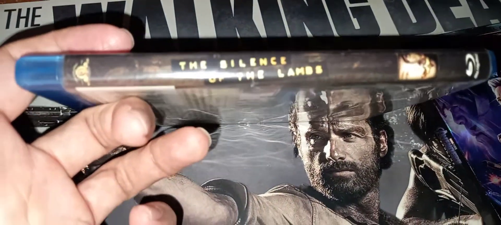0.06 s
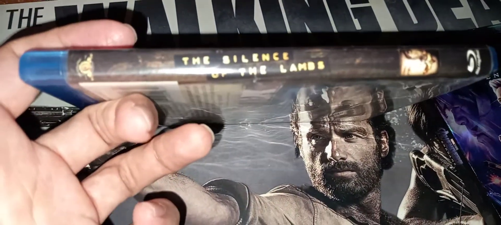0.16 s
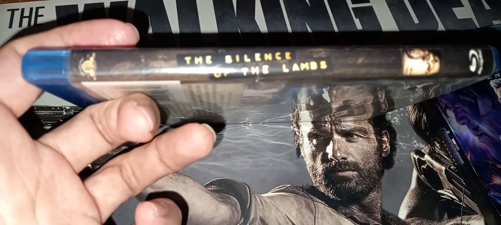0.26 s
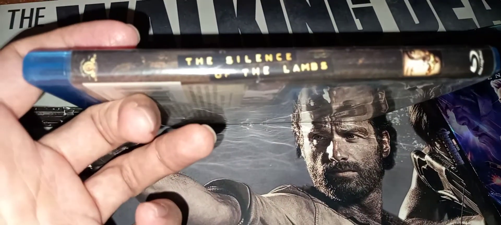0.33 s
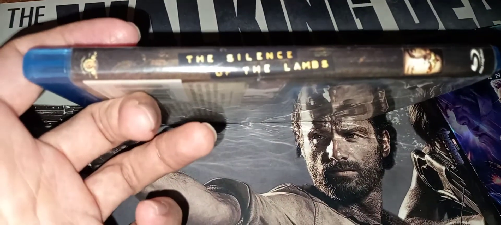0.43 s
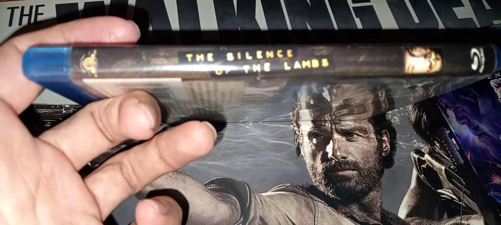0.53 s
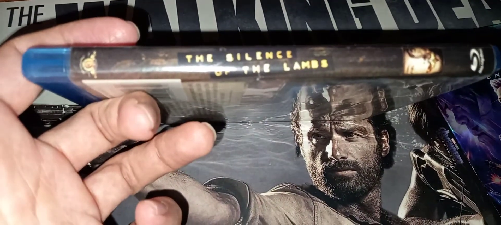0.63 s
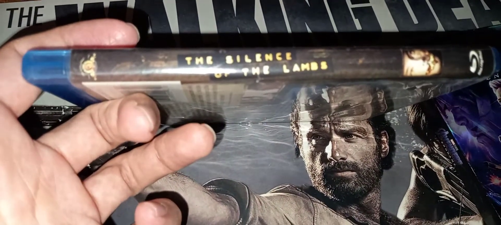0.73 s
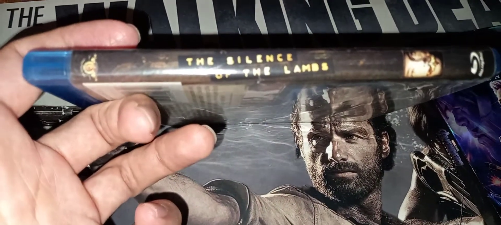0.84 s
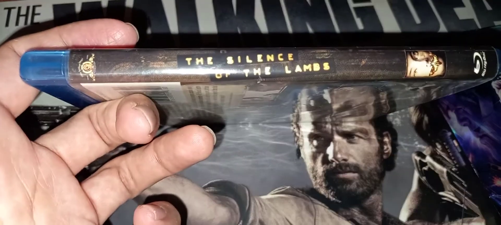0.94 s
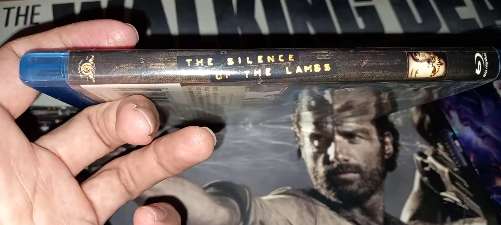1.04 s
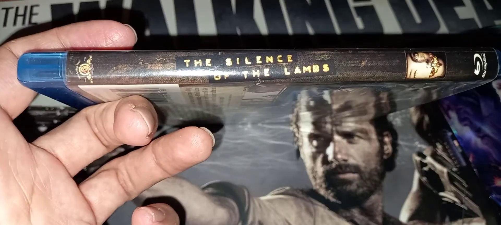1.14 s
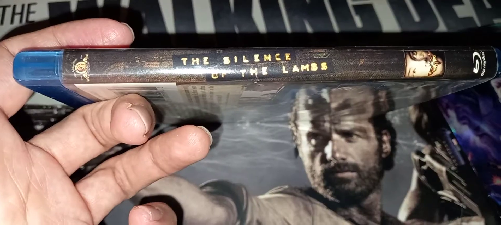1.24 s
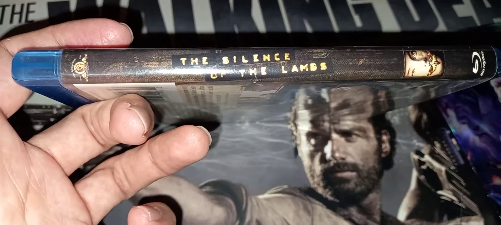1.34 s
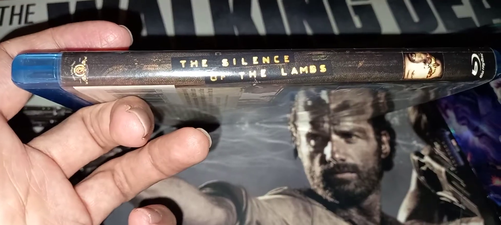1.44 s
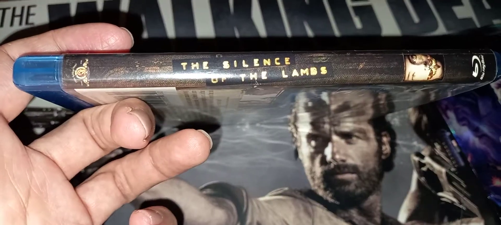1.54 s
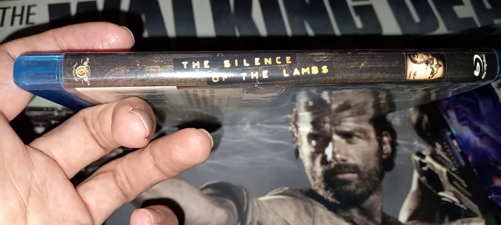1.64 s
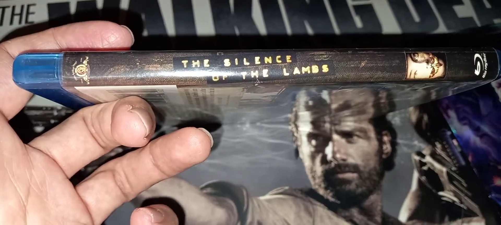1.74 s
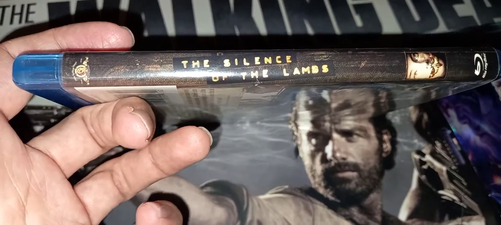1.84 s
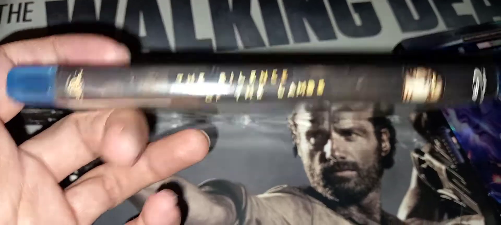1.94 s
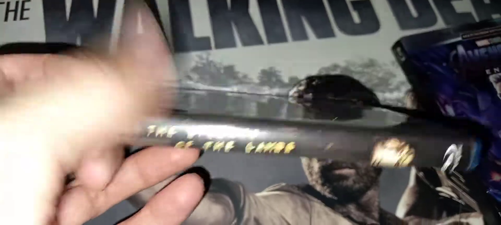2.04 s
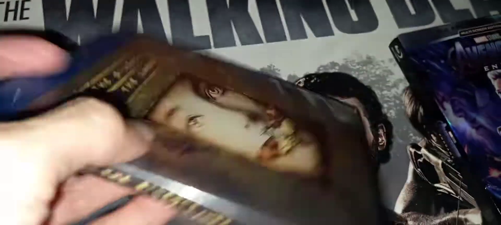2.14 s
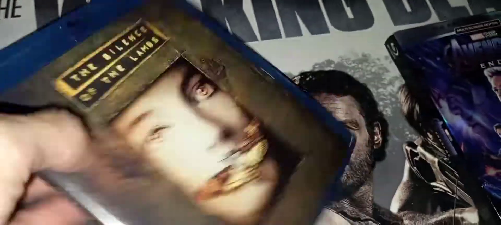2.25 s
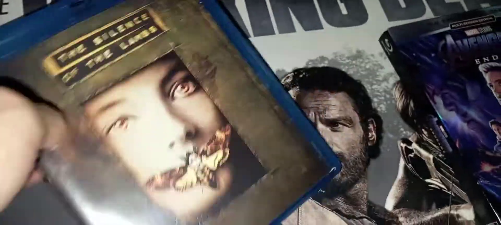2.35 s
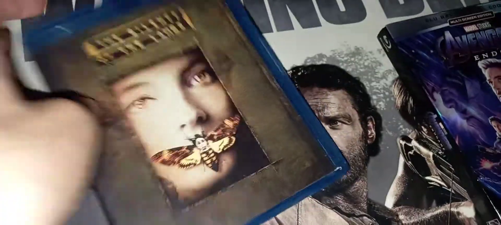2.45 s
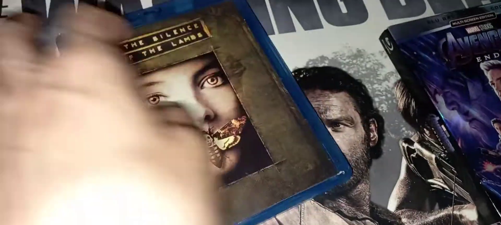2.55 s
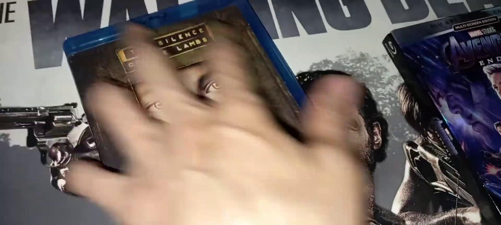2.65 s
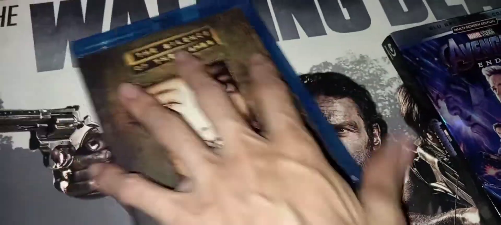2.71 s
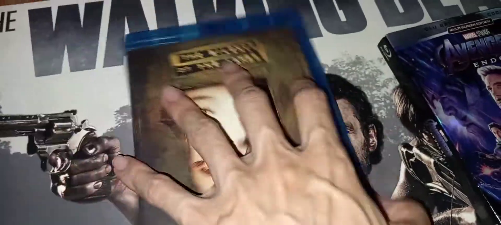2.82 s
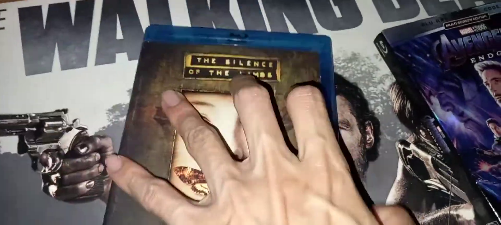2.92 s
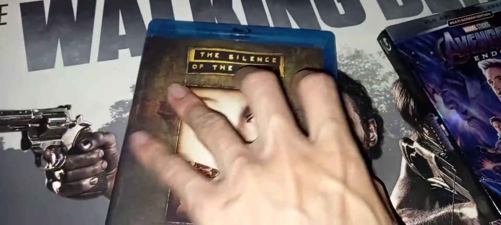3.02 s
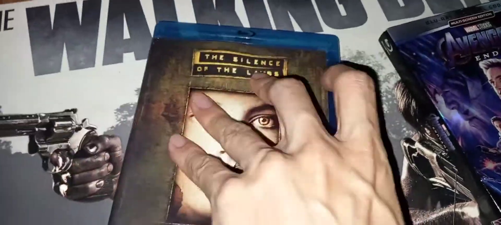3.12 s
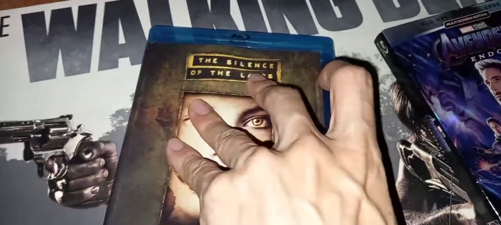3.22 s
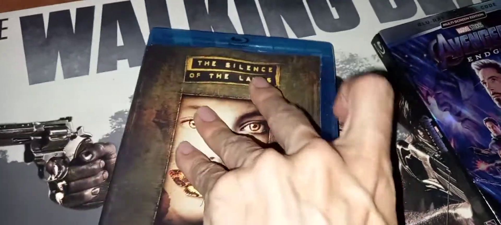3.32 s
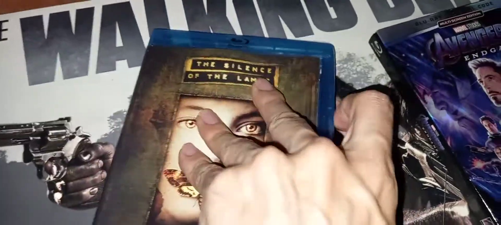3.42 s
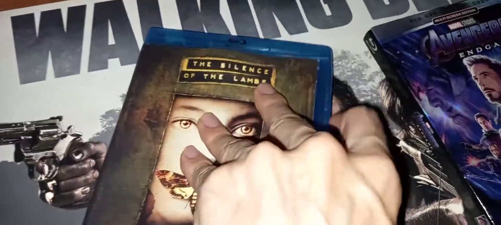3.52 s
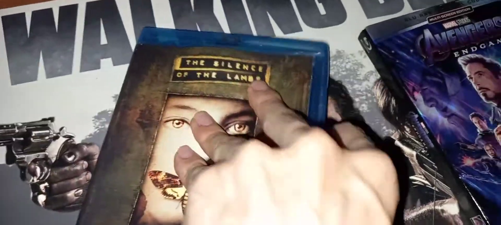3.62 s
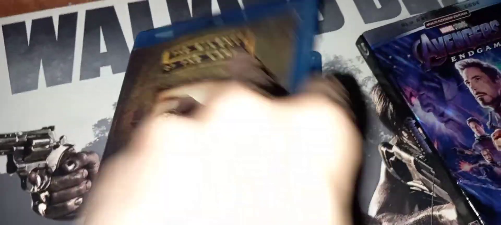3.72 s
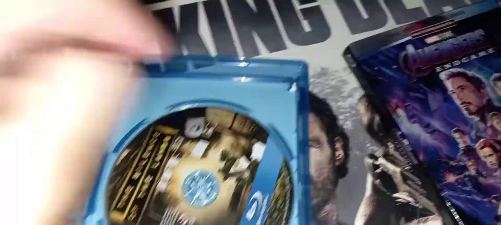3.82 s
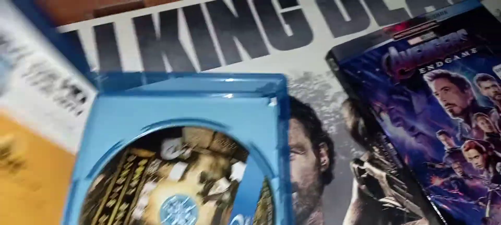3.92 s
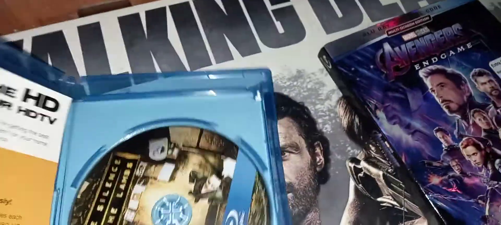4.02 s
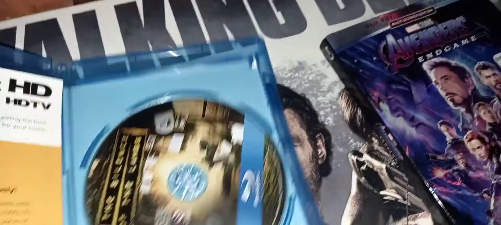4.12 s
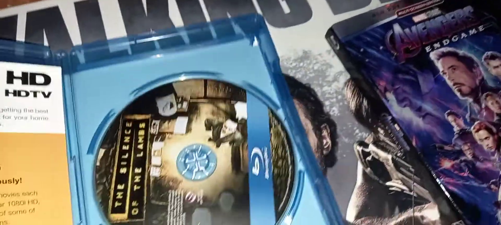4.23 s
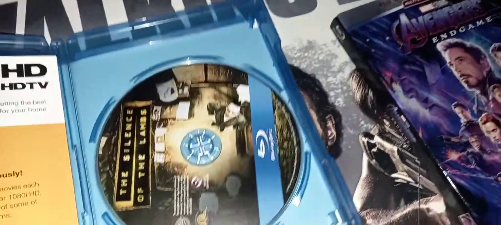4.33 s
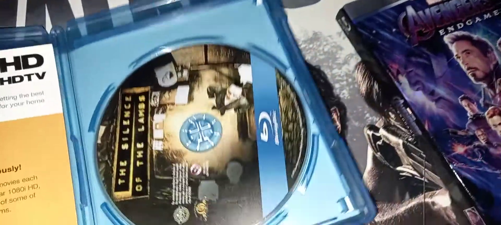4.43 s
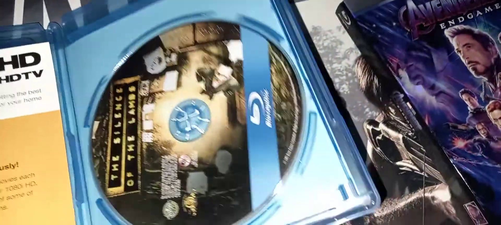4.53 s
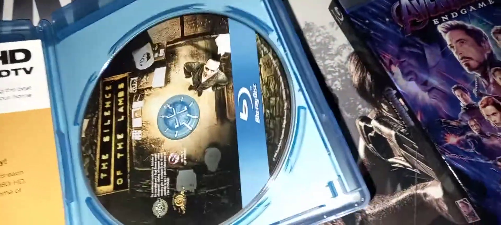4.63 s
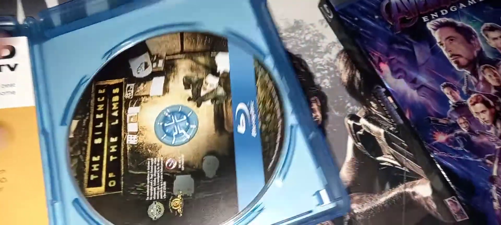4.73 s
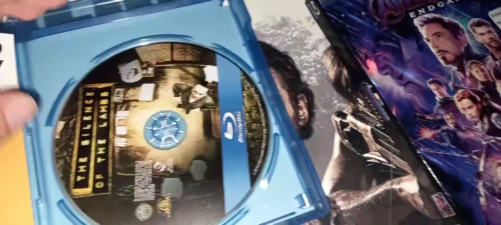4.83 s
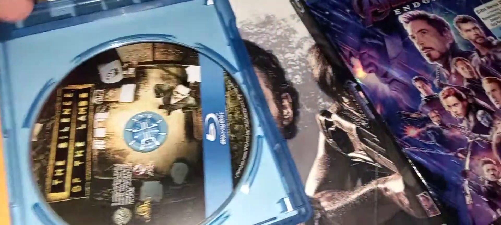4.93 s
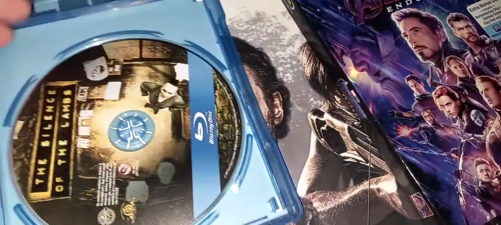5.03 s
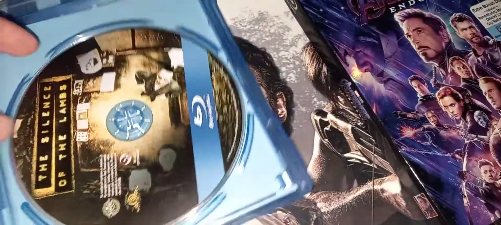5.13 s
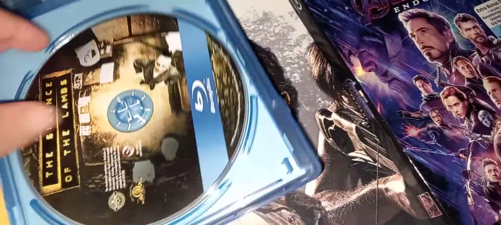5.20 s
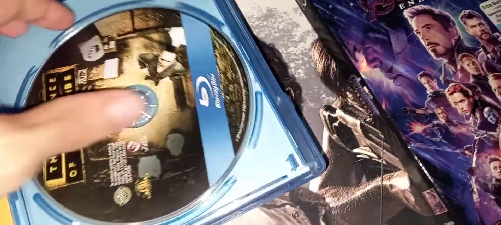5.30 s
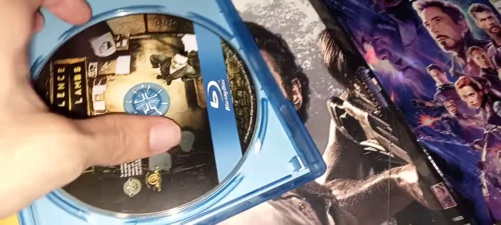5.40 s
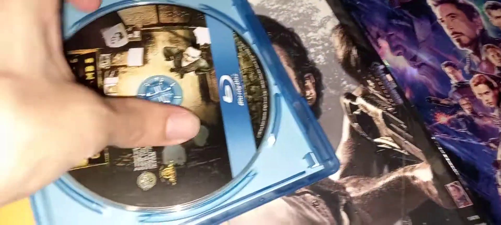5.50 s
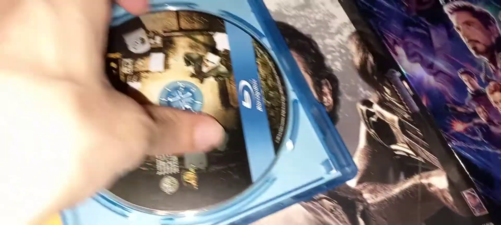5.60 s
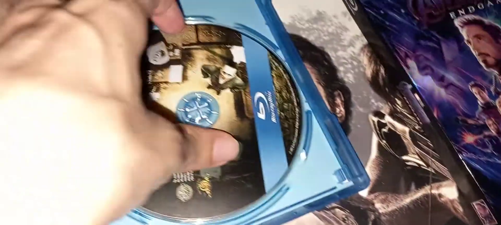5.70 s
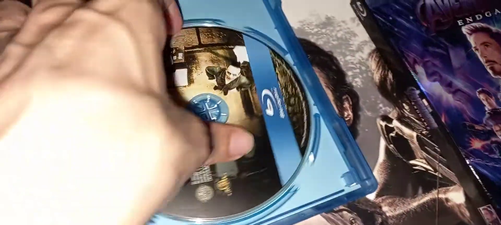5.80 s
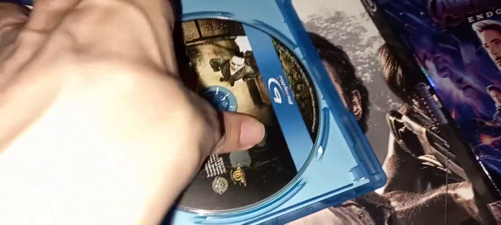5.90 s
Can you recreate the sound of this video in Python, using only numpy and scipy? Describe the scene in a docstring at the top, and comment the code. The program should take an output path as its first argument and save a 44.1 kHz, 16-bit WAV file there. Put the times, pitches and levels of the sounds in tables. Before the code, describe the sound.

A quiet indoor room with soft fan-like hum. A hand turns a thin plastic case, then slaps it down sharply on a paper-covered table. It slides slightly, then its catch squeaks and snaps open, the hinge rattling quickly. After a pause, fingers tap and tick on the disc and tray, with faint high chirps far off. Close handheld two-channel microphone, little echo.

```python
"""In a quiet room with a fan-like hum and faint far chirps, a plastic disc case is turned, slapped down
on a poster on a table, slid, prised open with a squeak and a rattle of hinge slips, then fingered.
Blows and stick-slip pulses set off damped resonances of the case. Friction is uneven noise, partly
ringing the shell. The air is shaped noise with a wavering tone, and each chirp is a falling note.
Two microphone ports hear it all, with echoes of the case and the chirps."""
import sys
import numpy as np
from scipy import signal
from scipy.fft import rfft, irfft, next_fast_len
from scipy.io import wavfile
from scipy.ndimage import uniform_filter1d

SR = 44100
rng = np.random.default_rng(int(sys.argv[2]) if len(sys.argv) > 2 else 0)


def pcm_store(signal):
    """Save signal as 16-bit PCM."""
    levels = np.round(np.clip(np.atleast_2d(signal), -1, 1) * 32767)
    wavfile.write(sys.argv[1], SR, levels.astype(np.int16).T)


N = 262836

# Resonances of the plastic shell. Each row: pitch in Hz, width in Hz, strength in dB.
SHELL_MODES = [(1153, 214, 1.5), (1345, 263, 3.5), (1617, 270, 1.5), (2047, 187, -3.5), (2207, 540, -0.5)]
# Resonances of the hollow inside the case. Each row: pitch in Hz, width in Hz, strength in dB.
HOLLOW_MODES = [(503, 158, -1), (711, 130, 1.5), (896, 450, -26)]


def gain_of(db):
    """Turns decibels into a plain multiplier."""
    return 10 ** (np.asarray(db) / 20)


def evened(x):
    """Scales a signal to an average (rms) level of 1."""
    return x / np.sqrt(np.mean(x ** 2) + 1e-20)


def read(points, hz):
    """Reads a curve between its points, with pitch on a logarithmic scale."""
    f, value = np.transpose(points)
    return np.interp(np.log(hz + 1), np.log(f + 1), value)


def along(rows, column):
    """One column of a time curve, at every sample."""
    rows = np.array(rows)
    return np.interp(np.arange(N) / SR, rows[:, 0], rows[:, column])


def add(mix, s, sound):
    """Adds a sound to the mix, starting at s seconds."""
    part = mix[..., round(s * SR):][..., :sound.shape[-1]]
    part += sound[..., :part.shape[-1]]


def ring(modes, contact_ms=0.):
    """Answer of damped resonances to one push, peak 1; a longer contact leaves out the treble."""
    t = np.arange(4096) / SR
    out = np.zeros(len(t))
    for k, (hz, width, db) in enumerate(modes):
        # a wider resonance dies faster; neighbours swing in opposite directions
        dying = np.exp(-np.pi * width * t)
        out += (-1) ** k * gain_of(db) * dying * np.sin(2 * np.pi * hz * t)
    push = np.hanning(3 + int(contact_ms * SR / 1000))
    out = np.convolve(out, push)[:len(t)]
    return out / abs(out).max()


def coloured(x, points):
    """Shapes the spectrum of a steady signal."""
    size = next_fast_len(N)
    gain = gain_of(read(points, np.fft.rfftfreq(size, 1 / SR)))
    return irfft(rfft(x, size) * gain, size)[..., :N]


def air():
    """Steady room noise in drifting patches, with a low hum that wavers in pitch and level."""
    # How alike the two ports hear the noise. Each row: pitch in Hz, likeness from -1 to 1.
    likeness = [(60, 0.77), (180, 0.83), (550, 0.71), (1650, -0.27), (4970, 0.13), (15000, -0.03)]
    # Relative spectrum of the noise. Each row: pitch in Hz, level in dB per Hz.
    spectrum = [(25, 8), (55, -2), (95, 1.5), (205, -7.5), (260, -14), (325, -6), (450, -15.5), (630, -8),
                (940, -4), (1250, -9.5), (2500, -10.5), (3100, -26.5), (5500, -30.5), (6900, -24.5),
                (7600, -44), (16000, -41.5)]
    # Strength of the hum. Each row: time in seconds, level in dB.
    hum_levels = [(0.0, -87), (0.13, -56), (0.53, -53.5), (0.58, -62.5), (1.03, -52), (1.73, -82),
                  (2.12, -50.5), (2.26, -68), (2.8, -56.5), (2.92, -62), (3.62, -56.5), (3.95, -70),
                  (4.1, -58.5), (4.7, -68), (4.86, -51.5), (5.21, -70), (5.96, -58)]
    noise_db, hum_hz, hum_waver_hz = -55.5, 94, 10

    frames, hz = N // 256 + 5, np.fft.rfftfreq(1024, 1 / SR)
    a, b, c, d, patches = rng.standard_normal((frames, 513, 5)).T
    patches = uniform_filter1d(patches, 12, 0)
    patches = evened(uniform_filter1d(patches, 14, 1))
    same = np.clip(read(likeness, hz), -1, 1)[:, None]
    left = a + 1j * b
    right = same * left + np.sqrt(1 - same ** 2) * (c + 1j * d)
    z = np.array([left, right]) * gain_of(1.5 * patches)
    wash = signal.istft(z, nperseg=1024, noverlap=768)[1][:, :N]
    wash = gain_of(noise_db) * evened(coloured(wash, spectrum))

    waver = evened(uniform_filter1d(rng.standard_normal(N), 900))
    turns = np.cumsum(hum_hz + hum_waver_hz * waver) / SR
    hum = np.sqrt(2) * gain_of(along(hum_levels, 1)) * np.sin(2 * np.pi * turns)
    return wash + hum


def rubs():
    """Friction: dense uneven grains give a skin hiss and scrape the shell into ringing."""
    # Hands and case sliding. Each row: start in seconds, length in seconds, rise in seconds, hiss in dB,
    # treble in dB relative to the hiss, shell scraping in dB.
    strokes = [(1.922, 0.15, 0.072, -57.5, -42, -59.5), (2.007, 0.61, 0.22, -62.5, -3, -62.5),
               (2.491, .09, 0.0049, -53.5, 1, -58), (2.694, 0.062, 0.019, -53.5, -29, -49.5),
               (2.712, 0.25, 0.047, -46, -1, -50), (3.038, 0.14, .042, -64.5, -7, -60.5),
               (3.275, 0.172, 0.091, -43.5, -4.5, -43), (3.441, 0.098, 0.044, -36.5, -7.5, -35),
               (3.513, 0.085, 0.01, -54, -7, -47.5), (3.57, 0.32, 0.012, -57.5, -7, -51.5),
               (3.843, 0.17, 0.069, -60.5, -4.5, -69), (4.063, 0.17, 0.026, -59.5, -8, -87),
               (4.921, 0.088, .0085, -60.5, -1.5, -59.5), (5.243, 0.063, .005, -75.5, 13, -94),
               (5.413, 0.06, 0.026, -57, -19, -56), (5.754, .047, 0.0042, -66, 3, -75),
               (5.843, 0.05, 0.0022, -55.5, 7, -58.5)]
    # A faint swish: the same columns without the start. Its negative rise makes the swish
    # begin abruptly, already partly faded, and then die away.
    swish = (0.72, -1.69, -68.5, -12, -55.5)
    # Hands staying on the case to the end: hiss in dB, treble in dB relative to the hiss.
    handling = (-67.5, -14)
    # Relative spectrum of the skin hiss. Each row: pitch in Hz, level in dB per Hz.
    skin = [(1470, -5), (2500, 4.5), (2600, -1.5), (3280, -6), (3740, 0), (4240, -2), (6600, -0.5),
            (8140, -6), (12300, -4), (16000, -15)]
    swish_count, swish_start_s, swish_every_s = 3, 0.34, 0.28
    handling_start_s, handling_rise_s = 1.95, .25
    fall_share = 0.41  # share of a stroke, after its rise, spent dying away
    waver_db = 1.6

    t = np.arange(N) / SR
    hiss_db, treble_db = handling
    steady = gain_of(hiss_db) * np.clip((t - handling_start_s) / handling_rise_s, 0, 1) ** 2
    steady_treble = gain_of(treble_db) * steady
    dull, bright, scrape = np.zeros((3, N))
    swishes = [(swish_start_s + k * swish_every_s, *swish) for k in range(swish_count)]
    for s, length, rise, hiss_db, treble_db, scrape_db in swishes + strokes:
        fall = fall_share * (length - rise)
        stroke = np.interp(t - s, [0, rise, length - fall, length], [0, 1, 1, 0]) ** 2
        dull += gain_of(hiss_db) * stroke
        bright += gain_of(hiss_db + treble_db) * stroke
        scrape += gain_of(scrape_db) * stroke

    # finger pressure wavers
    uneven = gain_of(waver_db * evened(uniform_filter1d(rng.standard_normal(N), 900)))
    grain_db = 0.63 * rng.exponential(1, (4, N // 64 + 1)).repeat(64, 1)[:, :N]
    grains = rng.standard_normal((4, N)) * gain_of(grain_db)
    hiss = evened(coloured(grains[:2], skin))
    low = signal.sosfiltfilt(signal.butter(2, 7500, fs=SR, output="sos"), hiss)
    treble = hiss - low
    skin_hiss = (uneven * dull + steady) * low + (uneven * bright + steady_treble) * treble

    shell = ring(SHELL_MODES, 0.24) + gain_of(-3) * ring(HOLLOW_MODES, 0.3)
    # each port also gets grains of the other, so that the two are alike but not equal
    shared_grains = grains[2:] + 0.85 * grains[:1:-1]
    scraped = signal.oaconvolve(shared_grains, shell[None], axes=1)[:, :N]
    return skin_hiss, uneven * scrape * evened(scraped)


def chirps():
    """A short, throbbing, slightly falling note with two overtones, dying away."""
    # Faint chirps. Each row: start in seconds, level in dB before throbbing, starting pitch in Hz,
    # each overtone in dB relative to the note.
    calls = [(0.8323, -65, 5080, -28), (4.741, -61, 5105, -36), (5.099, -57, 5140, -20)]
    t60_s, throb_db = 0.058, 4.0  # t60: time to die by 60 dB

    out, t = np.zeros(N), np.arange(8000) / SR
    for s, db, hz, over_db in calls:
        wobble = evened(uniform_filter1d(rng.standard_normal(len(t)), size=120))
        throb = evened(uniform_filter1d(rng.standard_normal(len(t)), size=200))
        turns = np.cumsum(hz * (1 - 0.18 * t + 0.021 * wobble)) / SR
        overtones = np.sin(4 * np.pi * turns) + np.sin(6 * np.pi * turns)
        note = np.sin(2 * np.pi * turns) + gain_of(over_db) * overtones
        level = gain_of(db + throb_db * throb - 60 * np.maximum(t - .025, 0) / t60_s)
        add(out, s, level * np.minimum(t / 0.004, 1) * note)
    return out


def chatter(ms, chance, loose, apart):
    """One clean click, then loose contacts for a few milliseconds, spread so that the ports differ."""
    n = np.arange(chance.shape[1])
    apart = np.clip(apart, 0, 1)
    contacts = np.sqrt(1 - apart ** 2) * chance[2] + apart * chance[:2]
    fading = np.exp(-(n / (max(ms, .2) * SR / 1000)) ** 2)
    return loose * contacts * fading + (n == 0)


def blows(rows, body):
    """Each blow rings the body, the brittle treble of the plastic and the hollow of the case."""
    # Brittle treble resonances. Each row: pitch in Hz, width in Hz, strength in dB.
    brittle = [(2810, 155, -5.5), (4240, 550, 2), (5130, 140, -4.5), (6470, 1240, 7.5), (8900, 640, -5),
               (10500, 5400, 10)]
    out, chance = np.zeros((2, N)), rng.standard_normal((len(rows), 3, 900))
    uneven = rng.uniform(0.53, 1.47, len(rows))  # each blow chatters for its own time
    shell, crack, hollow = ring(body, 0.21), ring(brittle), ring(HOLLOW_MODES, 0.5)
    for (s, db, crack_db, hollow_db, ms), noise, share in zip(rows, chance, uneven):
        # the heavy parts settle sooner than the brittle edges
        # resonance, relative dB, looseness, port difference, share of the chatter time
        parts = ((shell, 0, .12, .6, .6),
                 (crack, crack_db, .3, .9, 1),
                 (hollow, hollow_db, .05, .3, .8))
        for modes, part_db, loose, apart, lasting in parts:
            contacts = chatter(lasting * share * ms, noise, loose, apart)
            sound = signal.fftconvolve(contacts, modes[None], axes=1)
            add(out, s, gain_of(db + part_db) * sound / abs(sound.mean(0)).max())
    return out


def knocks():
    """Knocks and snaps ring the shell; a lighter one chatters longer."""
    # Each row: start in seconds, body peak in dB, crack in dB relative to the body,
    # hollow in dB relative to the body.
    hits = [(2.006, -45, -12, -14), (2.4044, -44.5, -14, 5), (2.4938, -5.5, -9, -12.5),
            (2.708, -38, -23, -6), (2.7554, -36.5, -15, -4), (2.956, -44, -12, -8), (3.2192, -30, -24, -40),
            (3.2329, -37, -16, -7), (3.483, -17, -14, -8.5), (3.495, -17, -7, -11.5),
            (3.5065, -11, -8, -12.5), (3.5143, -27, -3, 3), (3.5362, -29.5, -23, -4.5),
            (5.7738, -42, -6, 4.5)]
    full_force_ms, lighter_ms_per_db = 1.3, .14  # full force is 0 dB
    return blows([(*row, full_force_ms - lighter_ms_per_db * row[1]) for row in hits], SHELL_MODES)


def ticks():
    """Tiny broad clicks of skin and nail letting go of plastic."""
    # Each row: start in seconds, peak in dB, treble ring in dB relative to the main ring.
    clicks = [(2.0776, -49.5, -14), (2.1618, -52, -18), (2.7138, -43.5, -17), (4.4357, -47, -19),
              (4.493, -51, -20), (4.5096, -48.5, -20), (4.929, -40.5, -21), (4.9767, -42.5, -21),
              (5.247, -43, -28), (5.305, -40, -1), (5.313, -44.5, -16), (5.427, -51, -8), (5.44, -35, -8),
              (5.5762, -46.5, 2), (5.6595, -44, -8), (5.749, -41, 1), (5.839, -40, -10), (5.902, -40, -4)]
    out, chance = np.zeros((2, N)), rng.standard_normal((len(clicks), 3, 900))
    for (s, db, top_db), noise in zip(clicks, chance):
        click = ring([(6730, 870, 0)], .06) + gain_of(top_db) * ring([(12800, 1000, 0)])
        contacts = chatter(5.4, noise, 0.12, 0.88)
        sound = signal.fftconvolve(contacts, click[None, :400], axes=1)
        add(out, s, gain_of(db) * sound / abs(sound.mean(0)).max())
    return out


def thuds():
    """The whole case pushes on the table top; a soft landing rings only the deepest modes."""
    # Each row: start in seconds, peak in dB.
    landings = [(2.496, -24.5), (2.509, -34.5), (2.765, -32.5), (3.508, -38), (3.596, -35), (3.755, -38.5)]
    # Resonances of the thud. Each row: pitch in Hz, width in Hz, strength in dB.
    thump = [(85, 100, -8), (145, 41, -6.5), (196, 99, -0.5), (295, 68, -1.5), (473, 110, 2)]
    hard_db, hard_ms, softer_ms_per_db = -27, 1.43, 1.5  # a weaker thud stays in contact longer
    out = np.zeros(N)
    for s, db in landings:
        contact_ms = max(hard_ms + softer_ms_per_db * (hard_db - db), 0)
        add(out, s, gain_of(db) * ring(thump, contact_ms))
    return out


def squeak():
    """The catch drags: regular stick-slip pulses, slightly uneven, ring the shell."""
    # Each row: time in seconds, slips per second in Hz, level in dB.
    drag = [(3.291, 559.4, -30), (3.303, 534, -30.5), (3.309, 423.6, -34.5), (3.325, 385.7, -29),
            (3.346, 425, -29.5), (3.365, 530, -27), (3.37, 632.6, -23.5), (3.381, 715, -26.5),
            (3.393, 526, -26), (3.399, 476, -31), (3.406, 457.3, -31)]
    rough_start, rough_end = .1, .24  # slips grow more uneven as the catch nears its release (0 to 1)
    grip_hz = 139  # the prising fingers damp the shell: extra width of its resonances

    db, slips_hz, t = along(drag, 2), along(drag, 1), np.arange(N) / SR
    start, end = drag[0][0], drag[-1][0]
    rough = np.interp(t, [start, end], [rough_start, rough_end])
    waver = evened(uniform_filter1d(rng.standard_normal(N), 90))
    turns = np.cumsum(slips_hz * (1 + 0.2 * rough * waver)) / SR
    # one pulse each time a whole turn is completed
    slips = np.diff(np.floor(turns), prepend=0) * gain_of(1.2 * rough * rng.standard_normal(N))
    grit = 0.022 * rough * rng.standard_normal(N) * np.exp(-(turns % 1) / 0.5)
    dragging = np.clip((t - start) / .007, 0, 1) ** 2 * (t < end)
    # faster slips are each made weaker, to hold the level
    drive = (slips + grit) * dragging * gain_of(db) / np.sqrt(slips_hz / SR)

    shell = ring(SHELL_MODES, 0.24) + gain_of(-15.5) * ring(HOLLOW_MODES, 0.35)
    shell += gain_of(-12) * ring([(3480, 640, 0)], 0.11)
    shell *= np.exp(-np.pi * grip_hz * t[:len(shell)])
    return signal.oaconvolve(drive, shell / np.linalg.norm(shell))[:N]


def jerks():
    """The catch jerks free as the squeak ends, each jerk a blow on the shell."""
    # Each row: start in seconds, body peak in dB.
    releases = [(3.4029, -30), (3.41, -23.5), (3.4166, -26), (3.4248, -20), (3.4473, -23.5), (3.463, -20.5),
                (3.471, -22)]
    # For every jerk: crack and hollow in dB relative to the body, typical chatter in milliseconds.
    character = (-18, -30, 4.8)
    return blows([(*row, *character) for row in releases], SHELL_MODES)


def hinge_slips():
    """The hinge slips as the lid swings, each slip a blow on the shell."""
    # Each row: start in seconds, body peak in dB, crack in dB relative to the body.
    slips = [(3.5908, -20, -7.5), (3.6058, -24.5, -7), (3.6247, -27, 0.8), (3.64, -27.5, 0),
             (3.6722, -26, -5), (3.6893, -30.5, -3), (3.7018, -30, -2), (3.7154, -31, -2.5),
             (3.7266, -35.5, 0.5), (3.7438, -37.5, -2), (3.7604, -48, -18), (3.7737, -41, -11),
             (3.8, -48, -20)]
    # For every slip: hollow in dB relative to the body, typical chatter in milliseconds.
    character = (-5, 5.5)
    return blows([(*row, *character) for row in slips], SHELL_MODES)


def taps():
    """Finger taps ring the disc tray."""
    # Each row: start in seconds, body peak in dB, crack in dB relative to the body,
    # hollow in dB relative to the body.
    touches = [(4.8294, -29.5, -17, -16), (5.1235, -45.5, -0.5, -27), (5.4088, -29, -14, -17),
               (5.451, -21.5, -13.5, -18), (5.4906, -43, -5.5, -5.5), (5.652, -44.5, -4, -19),
               (5.8523, -41, 0, -26), (5.894, -40.5, -8, -10)]
    # Resonances of the tray. Each row: pitch in Hz, width in Hz, strength in dB.
    tray = [(1285, 130, 0), (680, 94, -7), (2020, 106, 7), (2670, 290, -2), (3720, 680, 4)]
    typical_chatter_ms = 3
    return blows([(*row, typical_chatter_ms) for row in touches], tray)


def room(x):
    """Sparse echoes of random sign, each band dying at its own speed, other echoes for each port."""
    # Each row: pitch in Hz, time to die by 60 dB in seconds.
    dying = [(200, 0.28), (1000, 0.071), (4000, 0.18), (12000, 0.097)]
    echoes = np.zeros((2, SR // 2))
    at = np.arange(120, SR // 2 - 20, 20)
    at = at + rng.integers(0, 20, (2, len(at)))
    np.put_along_axis(echoes, at, rng.choice([-1., 1.], at.shape), 1)
    hz, t, z = signal.stft(echoes, SR, nperseg=128)
    fading = gain_of(-60 * t / read(dying, hz)[:, None])
    tail = signal.istft(z * fading, SR, nperseg=128)[1]
    return signal.fftconvolve(x[None], tail / np.linalg.norm(tail[0]), axes=1)[:, :N]


def ports(x):
    """The direct sound reaches the two microphone ports with a phase lead that varies with pitch."""
    # Each row: pitch in Hz, lead of the left port over the right in radians.
    phase_lead = [(0, 0.68), (5860, 0.68), (9560, 3.8), (10900, 3.2), (12500, 13), (13700, 7.1),
                  (15800, 13), (16400, 38)]
    size = next_fast_len(N + 4096)
    # half the lead goes to each port, in opposite directions
    lead = np.exp(.5j * read(phase_lead, np.fft.rfftfreq(size, 1 / SR)))
    return irfft(rfft(x, size) * np.array([lead, 1 / lead]), size)[:, :N]


def scene():
    """Mixes the case, the hands, the far chirps, their echoes and the air."""
    hiss, scrape = rubs()
    struck = knocks() + jerks() + hinge_slips() + taps()
    case = struck + thuds() + ticks() + squeak() + scrape
    far = chirps()
    echoes = gain_of(-9.0) * room(case.mean(0)) + gain_of(-2) * room(far)
    return ports(case) + hiss + far + echoes + air()


def record(dry):
    """The two ports hear each pitch unequally; the deepest bass is cut; then the treble limit."""
    # Each row: pitch in Hz, left minus right level in dB.
    balance = [(60, -1.5), (250, -3.5), (600, 0.5), (1100, -6), (1900, -7.5), (3500, -4), (6500, 4.5),
               (9000, -4.5), (15000, -0.5)]
    leaned = [coloured(x, [(hz, side * db / 2) for hz, db in balance]) for x, side in zip(dry, (1, -1))]
    leaned = signal.sosfilt(signal.butter(4, 56, "high", fs=SR, output="sos"), leaned)
    treble_limit = signal.firwin(511, 16000, window=("kaiser", 9), fs=SR)
    return signal.oaconvolve(leaned, treble_limit[None], "same")


dry = scene()
out = record(dry)
pcm_store(out)
```